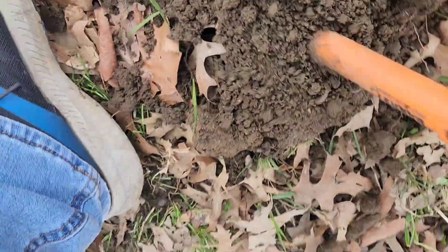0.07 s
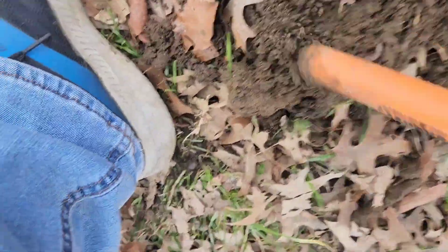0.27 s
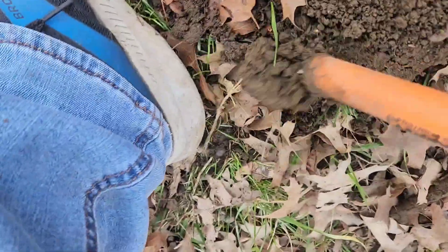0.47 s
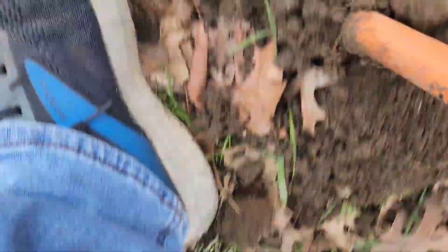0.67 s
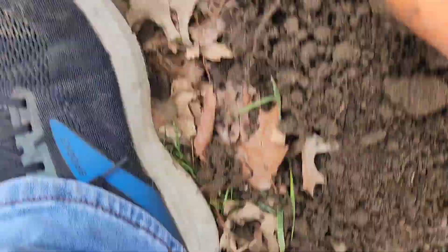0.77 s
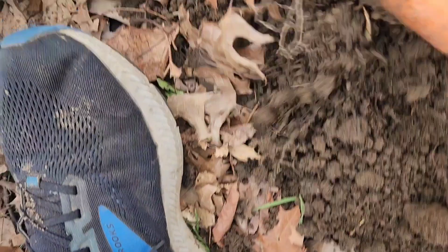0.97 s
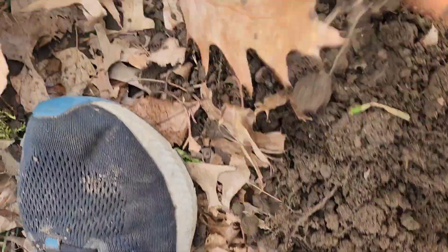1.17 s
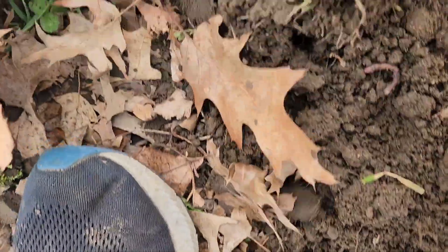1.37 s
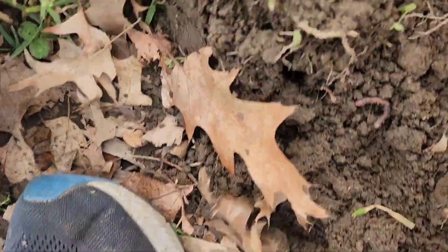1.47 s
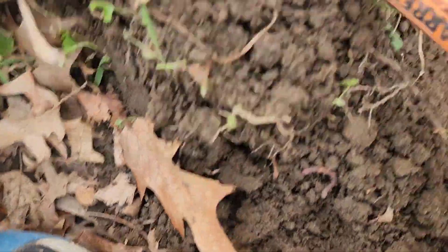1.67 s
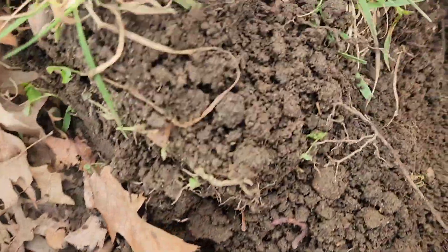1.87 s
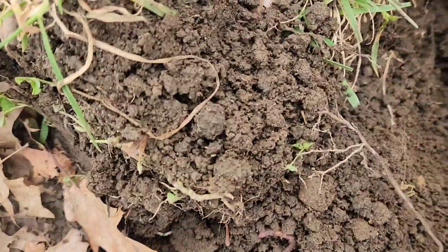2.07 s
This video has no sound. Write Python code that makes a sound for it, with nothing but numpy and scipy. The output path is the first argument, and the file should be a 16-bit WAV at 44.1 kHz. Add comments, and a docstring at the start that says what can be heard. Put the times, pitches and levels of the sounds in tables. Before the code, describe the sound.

Close digging in a park: earth crumbles and dry leaves crackle with each push of a hand tool. A short gritty scrape, a soft thud of earth and another scrape follow, while a far engine drones in a low rumble.

```python
"""A hand digger works loose soil and dry leaves in a park, close by and a little to the left.
From the start crumbs trickle, pushes of the tool crunch them and stalks snap, over a distant engine's
drone and a low outdoor rumble. Grit scrapes along the blade at 0.6 s, a clod lands softly at 0.83 s,
and the blade scrapes again at 1.15 s. Then the engine slows a little while the digging goes on."""
import sys
import numpy as np
from scipy import signal
from scipy.fft import rfft, irfft
from scipy.io import wavfile
from scipy.ndimage import uniform_filter1d

SR = 44100
rng = np.random.default_rng(int(sys.argv[2]) if len(sys.argv) > 2 else 0)


def transcribe(u):
    """Save the signal u as a 16-bit wav file named by the first command-line argument.

    u: samples, shape (n,) or (channels, n), limited to [-1, 1]; the rate is SR.
    q: integer samples, one column per channel.
    """
    v = np.clip(np.atleast_2d(u).T, -1, 1)
    q = np.round(v * 32767).astype(np.int16)
    wavfile.write(sys.argv[1], SR, q)


N = 93403


def undb(db):
    """Decibels to gain."""
    return 10 ** (np.asarray(db) / 20)


def unit(x):
    """Scale to rms 1."""
    return x / np.sqrt(np.mean(x ** 2))


def curve(table, column=1):
    """One column of a table, linearly interpolated over time."""
    rows = np.array(table)
    return np.interp(np.arange(N) / SR, rows[:, 0], rows[:, column])


def colour(x, table, column=1):
    """Filter by one gain column of a table of f/Hz, gain/dB."""
    rows = np.array(table)
    log_f = np.log(np.fft.rfftfreq(N, 1 / SR) + 1)
    gain_db = np.interp(log_f, np.log(rows[:, 0]), rows[:, column])
    return irfft(rfft(x) * undb(gain_db), N)


def ring(x, hz, width_hz):
    """Resonance with gain 1 at its centre."""
    f = np.fft.rfftfreq(x.shape[-1], 1 / SR)
    response = 1j * f * width_hz / (hz ** 2 - f ** 2 + 1j * f * width_hz)
    return irfft(rfft(x) * response, x.shape[-1])


def pan(left_db):
    """Constant-power channel gains for a left-minus-right level."""
    gains = undb(np.array([[.5], [-.5]]) * left_db)
    return gains / np.sqrt(np.mean(gains ** 2, axis=0))


def walk(rate_hz):
    """Smooth random drift, rms 1."""
    hold = int(SR / rate_hz)
    steps = np.repeat(rng.standard_normal(N // hold + 1), hold)
    return unit(uniform_filter1d(uniform_filter1d(steps, hold), hold)[:N])


def grains(times_s, sizes, hz, rel_width, ring_s=0.00036, order=1):
    """Tiny fractures: fast-dying noise bursts, each ringing at its own pitch; sizes are rms over 1 ms."""
    length, common = 256, 0.14  # samples; share of power common to both channels
    noise = rng.standard_normal((len(times_s), 3, length))
    burst = np.sqrt(common) * noise[:, :1] + np.sqrt(1 - common) * noise[:, 1:]
    burst *= np.exp(-np.arange(length) / SR / ring_s)
    hz = np.clip(hz, 600, 15000)[:, None, None]
    for _ in range(order):
        burst = ring(burst, hz, hz * rel_width)
    rms = np.sqrt(np.sum(burst ** 2, axis=2, keepdims=True) * 1000 / SR)
    burst *= sizes[:, None, None] / rms
    starts = np.maximum(times_s * SR, 0).astype(int)
    places = (starts[:, None] + np.arange(length)).ravel()
    return np.array([np.bincount(places, burst[:, c].ravel(), N)[:N] for c in range(2)])


def crunches(count=260, spread_db=2, spread_oct=0.42, trim_db=-0.5):
    """Each push of the tool breaks a dense swarm of grains that swells and dies away; the low swarm at 0.84 s
    is the landing clod crumbling apart."""
    # soil giving way under the tool, and the clod crumbling at 0.84 s: peak t/s, rise/s, fall/s, level/dB,
    # centre f/Hz, left shift/dB
    swarms = [(0.036, 0.0069, 0.014, -31, 4430, 0), (0.15, .004, 0.005, -32.5, 6070, -4),
              (0.311, 0.0037, 0.006, -26, 5460, -9), (0.363, 0.0059, 0.0073, -29.5, 5670, -4),
              (.632, .025, 0.016, -38, 5300, -6), (.838, 0.0035, 0.018, -37, 840, 3),
              (0.98, 0.011, 0.02, -26.5, 5760, -0.5), (1.171, .006, 0.0058, -23.5, 8200, 3),
              (1.193, .004, .007, -30.5, 4800, 4), (1.307, 0.016, 0.014, -31.5, 6760, -6),
              (1.3391, 0.0012, .0016, -20, 11000, 1), (1.383, 0.006, 0.015, -28, 7700, -2),
              (1.449, .005, .003, -25.5, 8900, 1), (1.557, .004, 0.01, -18, 4870, -1.5),
              (1.581, 0.014, 0.012, -26, 4800, -5.5), (1.661, 0.016, 0.016, -28.5, 4700, -3),
              (1.946, 0.012, 0.011, -25, 4440, -2.5), (1.957, 0.0045, 0.0037, -23, 8290, -10)]
    out = 0
    for peak_s, rise_s, fall_s, db, hz, left_db in swarms:
        size_draw, pitch_draw = rng.standard_normal((count, 2)).T
        along = np.linspace(-3, 3, count) + rng.uniform(-1, 1, count) / count  # time constants from peak
        span_s = np.where(along < 0, rise_s, fall_s)
        sizes = np.exp(-abs(along)) * np.sqrt(span_s) * undb(-spread_db * size_draw)
        grain_hz = hz * 2 ** (spread_oct * pitch_draw)
        swarm = grains(peak_s + along * span_s, sizes, grain_hz, rel_width=0.48)
        duty = (rise_s + fall_s) / 2 * SR / N
        out += unit(swarm) * np.sqrt(duty) * undb(db + trim_db) * pan(left_db)
    return out


def trickle(crumbs_per_s=4000, spread_db=3, spread_oct=0.79, clump_db=1.63):
    """Crumbs of every size roll over each other and over leaves, in small clumps."""
    # crumb flow: t/s, level/dB
    flow = [(0, -63), (.05, -35), (.1, -42), (.19, -41), (.245, -38.5), (.29, -49.5), (.33, -37.5),
            (.52, -39), (.62, -30.5), (.71, -40.5), (.82, -33), (.92, -41), (1.02, -33.5), (1.26, -36.5),
            (1.4, -34.5), (1.52, -44.5), (1.6, -37.5), (1.8, -45.5), (1.9, -43.5), (1.995, -41.5),
            (2.025, -35), (2.12, -37)]
    # crumb size, heard as pitch: t/s, centre f/Hz
    pitch = [(0, 4460), (.25, 4840), (.6, 6040), (1.0, 5630), (1.4, 6850), (1.55, 5100), (1.8, 4180),
             (1.95, 5982), (2.12, 7040)]
    count = int(crumbs_per_s * N / SR)
    size_draw, pitch_draw = rng.standard_normal((count, 2)).T
    times_s = rng.random(count) * N / SR
    hz = np.interp(times_s, *np.array(pitch).T) * 2 ** (spread_oct * pitch_draw)
    crumbs = grains(times_s, undb(spread_db * size_draw), hz, rel_width=0.72)
    clumps = undb(clump_db * walk(rate_hz=90))
    return unit(crumbs * clumps) * undb(curve(flow))


def snaps():
    """Single sharp cracks stand out of the crumbling; stiff stalks ring for a moment."""
    # dry leaf, stalk and grit: t/s, level/dB, centre f/Hz, width/centre
    cracks = [(0.039, -29, 5800, 0.72), (0.0584, -24.5, 2700, 1.6), (0.1206, -28.5, 3800, 2.4),
              (0.2249, -22, 2900, 1.5), (0.2667, -33.5, 5000, 0.77), (0.3084, -20, 5400, .7),
              (0.3128, -18, 5800, 1.04), (0.3158, -25, 3970, .8), (.499, -26, 2130, .8),
              (.594, -30, 1900, 0.41), (0.767, -27, 4100, 0.87), (0.773, -28, 11000, 1.4),
              (.8335, -21.5, 8100, 1.4), (0.9002, -27, 8500, 0.46), (0.9141, -31.5, 6500, 0.52),
              (0.9318, -28, 5840, 0.77), (0.945, -27, 6460, .45), (0.9517, -19.5, 3770, .27),
              (1.008, -32, 5160, 1.5), (1.0674, -24, 7450, 1), (1.0805, -27, 7900, 1.1),
              (1.1915, -30, 5200, .5), (1.226, -23.5, 7000, 0.58), (1.3384, -19.5, 5730, 0.16),
              (1.339, -19.5, 4050, .16), (1.338, -27, 12950, .7), (1.3671, -26, 6100, 1.9),
              (1.4114, -29, 6250, 1), (1.428, -28.5, 7000, 1.8), (1.4607, -27.5, 6850, .25),
              (1.638, -26, 5500, 1.1), (1.6599, -25, 3220, 1.3), (1.7454, -28, 6866, .8),
              (1.961, -24, 6400, 2.5), (2.0487, -40, 13500, .5)]
    times_s, db, hz, rel_width = np.array(cracks).T
    return grains(times_s, undb(db), hz, rel_width[:, None, None], ring_s=0.00042, order=2)


def scrapes(count=40, spread_db=4, spread_oct=0.07):
    """Grit catches and slips along the blade: ticks whose ring glides as the contact moves."""
    # blade strokes: start t/s, end t/s, level/dB, start f/Hz, end f/Hz
    strokes = [(0.564, 0.659, -42.5, 5500, 6700), (1.135, 1.179, -34, 4650, 6430)]
    out = 0
    for start_s, end_s, db, from_hz, to_hz in strokes:
        size_draw, pitch_draw = rng.standard_normal((count, 2)).T
        along = (np.arange(count) + rng.random(count)) / count
        hz = (from_hz + (to_hz - from_hz) * along) * 2 ** (spread_oct * pitch_draw)
        sizes = np.sqrt(np.sin(np.pi * along ** 2)) * undb(spread_db * size_draw)
        span_s = end_s - start_s
        ticks = grains(start_s + along * span_s, sizes, hz, rel_width=0.22, order=2)
        out += unit(ticks) * np.sqrt(span_s * SR / N) * undb(db)
    return out


def clod(at_s=0.833, rise_s=0.0011, trim_db=1.5):
    """A lump of earth lands with a short dull knock."""
    # damped modes: f/Hz, t60/s, level/dB
    modes = [(142, 0.096, -18.5), (337, 0.33, -35.5), (807, 0.042, -25.5), (1390, .13, -42)]
    age_s = np.maximum(np.arange(N) / SR - at_s, 0)
    knock = sum(undb(db - 60 * age_s / t60_s) * np.sin(2 * np.pi * hz * age_s) for hz, t60_s, db in modes)
    attack = 1 - np.exp(-age_s / rise_s)
    return knock * attack * undb(trim_db) * pan(left_db=3)


def rustle(hz=1594, width_hz=1520, flicker_db=1.4):
    """Loose earth slides with a soft, flickering rustle."""
    # sliding earth: t/s, level/dB
    slide = [(0, -47.5), (.5, -48.5), (.85, -42), (1.0, -43.5), (1.25, -48), (1.6, -51.5), (1.8, -48.5),
             (2.12, -62)]
    noise = rng.standard_normal((2, N))
    band = ring(ring(noise, hz, width_hz), hz, width_hz)
    return unit(band) * undb(curve(slide) + flicker_db * walk(rate_hz=69.34)) * pan(left_db=5.5)


def bumps(half_width_s=0.027, trim_db=-2):
    """Dull swells of a few cycles as tool and microphone move."""
    # low bumps: peak t/s, level/dB, f/Hz
    swells = [(0.014, -22.5, 142), (.06, -20, 55.4), (.85, -17, 62), (.96, -21, 42.2),
              (1.215, -26.5, 125.6), (1.28, -21, 40.2), (1.425, -18, 68.2), (1.575, -20, 57.7),
              (1.645, -22, 48), (1.83, -29.5, 123.9), (2.06, -20.5, 39.9)]
    t = np.arange(N) / SR
    out = 0
    for peak_s, db, hz in swells:
        envelope = undb(db + trim_db) * np.exp(-((t - peak_s) / half_width_s) ** 2)
        out += np.sqrt(2) * envelope * np.sin(2 * np.pi * (hz * t + rng.random()))
    return out


def engine(third_db=-49.5, waver_db=1.2, rel_jitter=0.00927):
    """Only the lowest three harmonics of the engine carry this far, and each wavers."""
    # firing rate: t/s, f/Hz
    firing = [(0, 68.45), (.23, 70.7), (.44, 72.51), (.9, 72.46), (1.2, 70.93), (1.35, 66.84), (1.55, 65),
              (1.75, 64.32), (2.12, 63)]
    # drone strength: t/s, fundamental level/dB, octave level/dB
    drone = [(0, -42, -43), (.075, -21, -30.5), (.19, -30, -30), (.28, -20, -36.5), (.35, -27, -36),
             (.6, -23, -33.5), (.69, -20, -35.5), (.8, -26, -37.5), (.96, -20.5, -35.5), (1.19, -23.5, -38),
             (1.3, -33, -37), (1.55, -41, -38.5), (1.62, -26.5, -41), (1.68, -20.5, -50),
             (1.76, -20.5, -40), (1.82, -26.5, -33), (2.0, -21.5, -29), (2.12, -37, -26)]
    firing_hz = curve(firing) * (1 + rel_jitter * walk(rate_hz=14.1))
    phase = 2 * np.pi * np.cumsum(firing_hz) / SR
    out = 0
    for harmonic, db in enumerate([curve(drone), curve(drone, column=2), third_db], start=1):
        rms = undb(db + waver_db * walk(rate_hz=18))
        out += np.sqrt(2) * rms * np.sin(harmonic * phase + 2 * np.pi * rng.random())
    return out


def outdoors(level_db=-26.5, waver_db=0.56):
    """Low rumble of the surroundings, near mono in the bass and wide above."""
    # rumble spectrum: f/Hz, relative density/dB
    spectrum = [(20, -6.5), (32, -4), (48, 1.5), (62, -3), (90, -7), (116, -3), (160, -10.5), (200, -9.5),
                (260, -14.5), (350, -19), (480, -24.5), (750, -27.5), (1150, -36), (2100, -37),
                (2700, -50.5), (6000, -63.5), (7700, -61), (9200, -87), (12000, -54), (16000, -60)]
    # stereo width: f/Hz, side-to-mid level/dB
    side_gain = [(30, -20), (70, -12.5), (120, -16), (250, -12.5), (500, -6), (1000, 1.5), (4000, 1)]
    mid, side = rng.standard_normal((2, N))
    stereo = mid + np.array([[1], [-1]]) * colour(side, side_gain)
    rumble = unit(colour(stereo, spectrum))
    return rumble * undb(level_db + waver_db * walk(rate_hz=6.22)) * pan(left_db=1.4)


def scene():
    """The digging close by, over engine and rumble."""
    # position of the work: t/s, left-minus-right level/dB
    position = [(0, 7), (.8, 8.5), (1.2, 11), (1.35, 9.5), (1.55, 10.5), (1.9, 6), (2.12, 3.5)]
    # colour of close sounds at the two microphone ports: f/Hz, left gain/dB, right gain/dB
    ports = [(500, 1, 7), (1450, 1, 3), (2130, 2, -6), (2310, -2, -7.5), (4540, -2.5, -2.5),
             (5260, -0.5, -4), (7470, -2.5, -6), (8260, -10, -13), (8900, -15, -26), (10240, -9, -17.5),
             (11640, -7, 5), (13100, -2.5, 3), (15300, -2.5, -2)]
    bed = outdoors() + engine() + rustle() + clod() + bumps()
    crackle = snaps() + crunches() + scrapes() + trickle()
    left, right = crackle * pan(curve(position))
    return bed + np.array([colour(left, ports), colour(right, ports, column=2)])


def record(dry, cutoff_hz=15900):
    """A steep low-pass cuts the top."""
    return signal.sosfilt(signal.ellip(10, .2, 80, cutoff_hz, fs=SR, output="sos"), dry)


dry = scene()
out = record(dry)
transcribe(out)
```